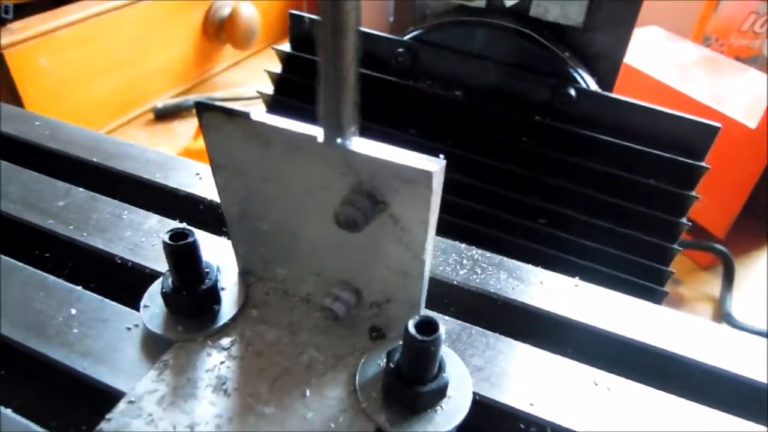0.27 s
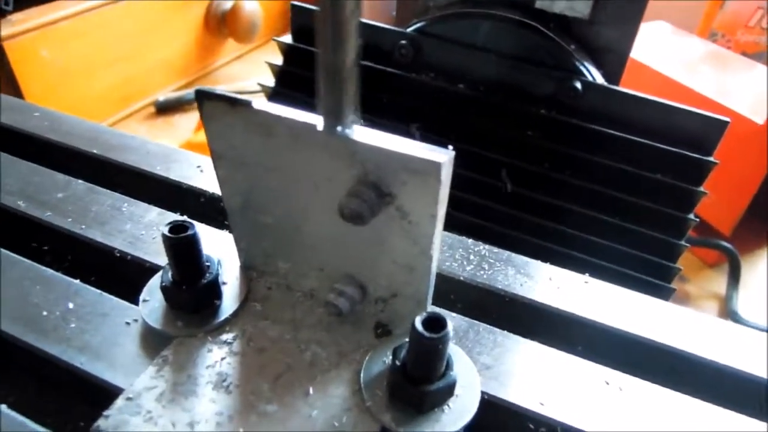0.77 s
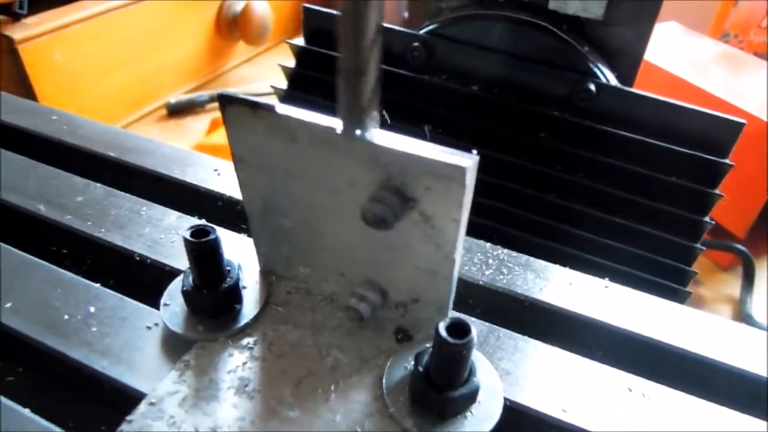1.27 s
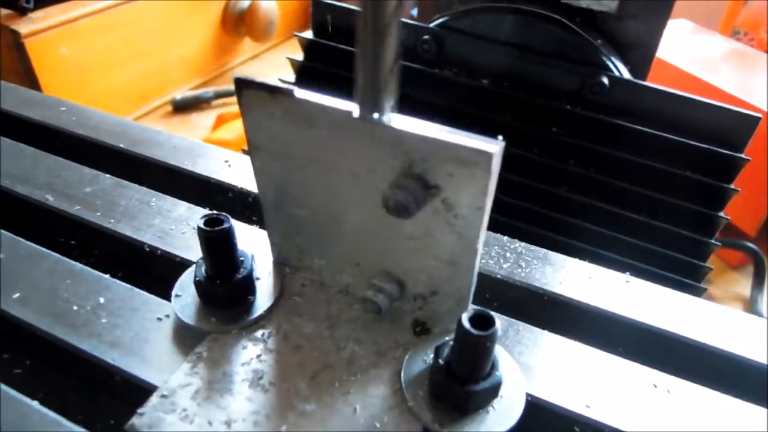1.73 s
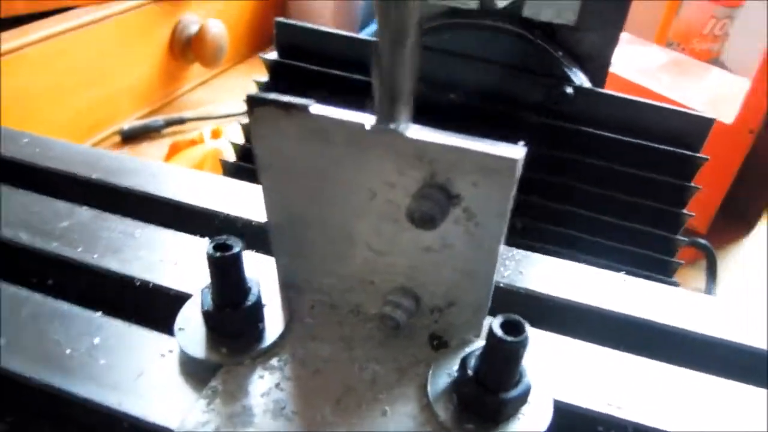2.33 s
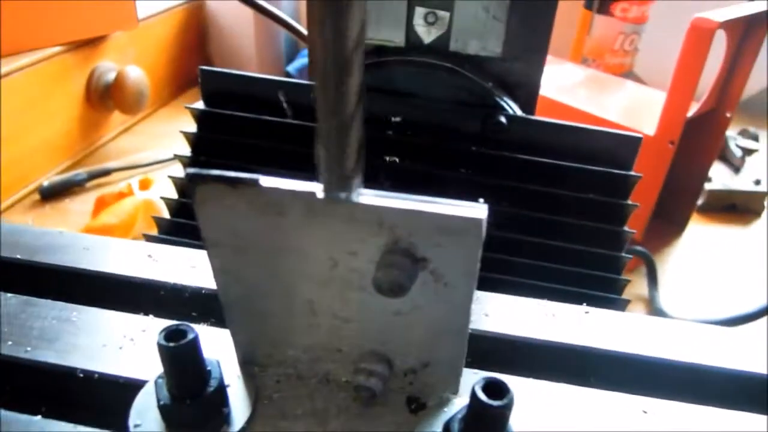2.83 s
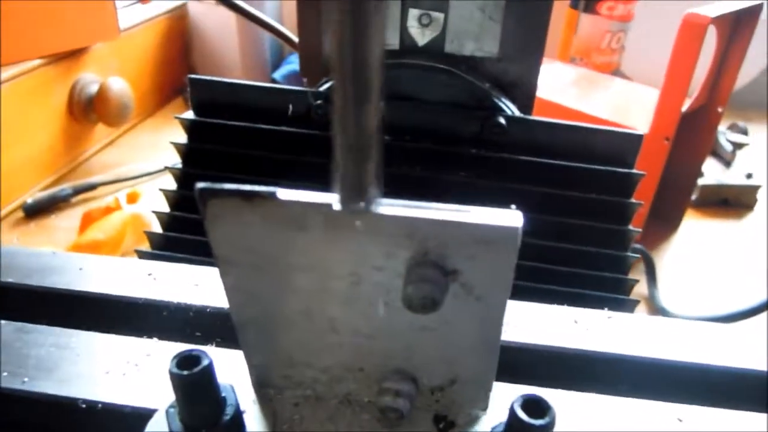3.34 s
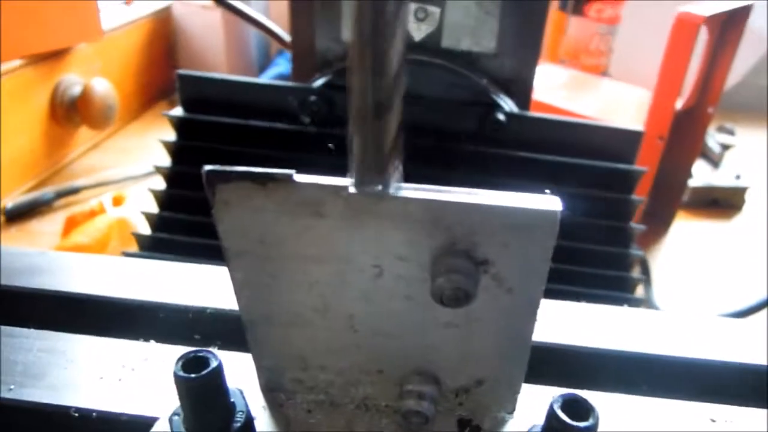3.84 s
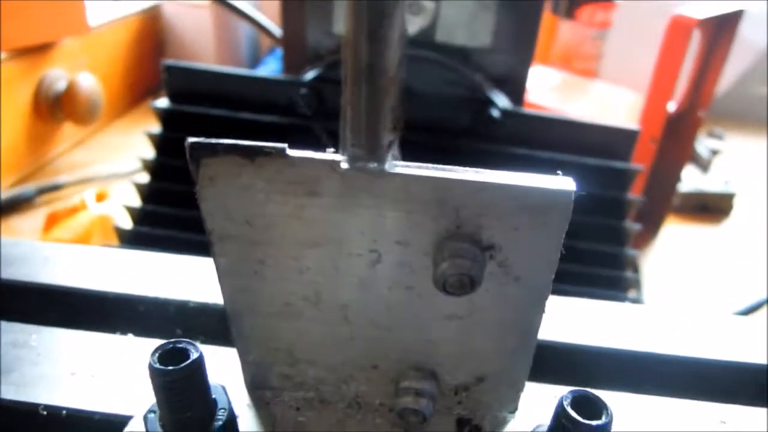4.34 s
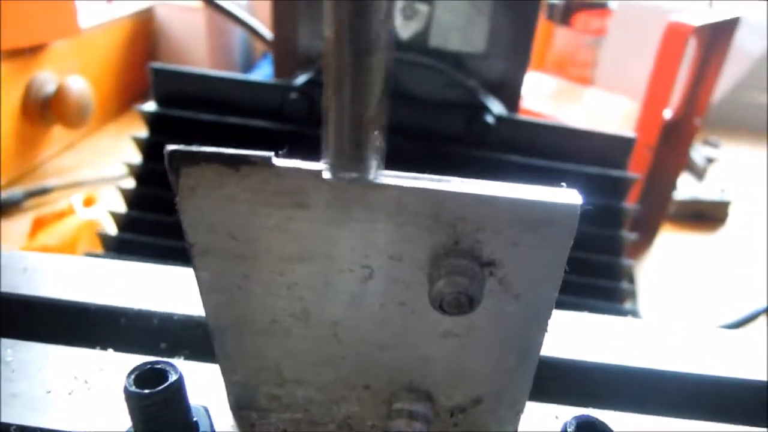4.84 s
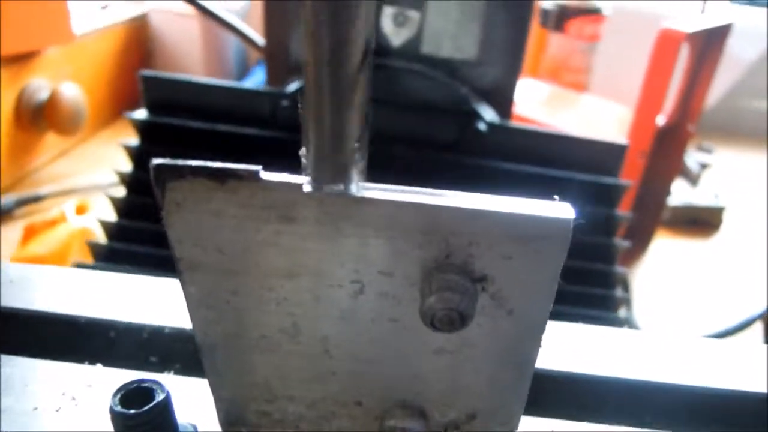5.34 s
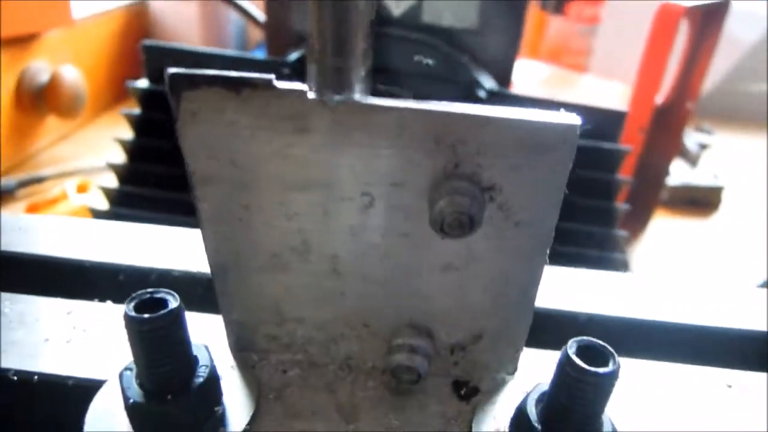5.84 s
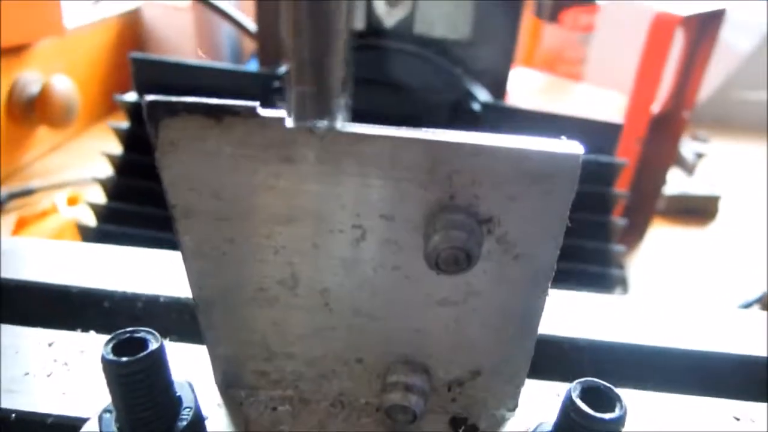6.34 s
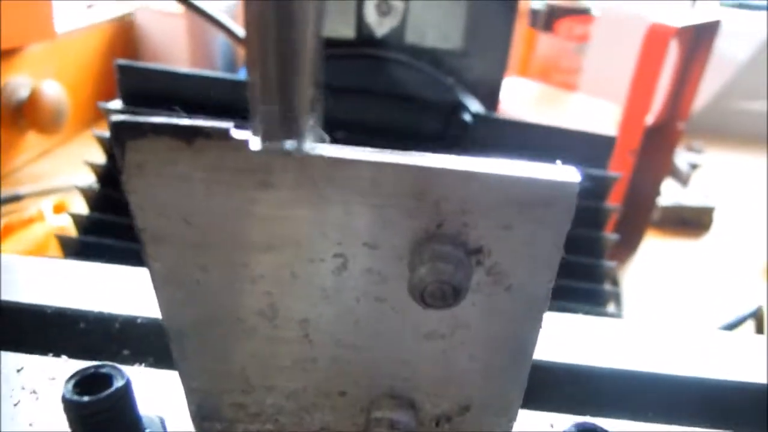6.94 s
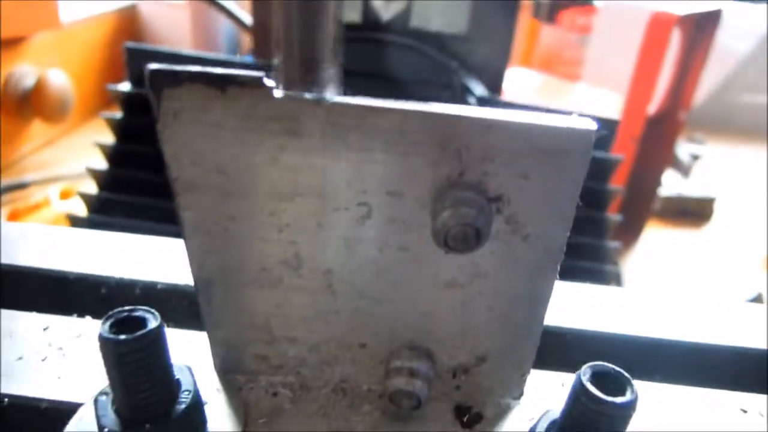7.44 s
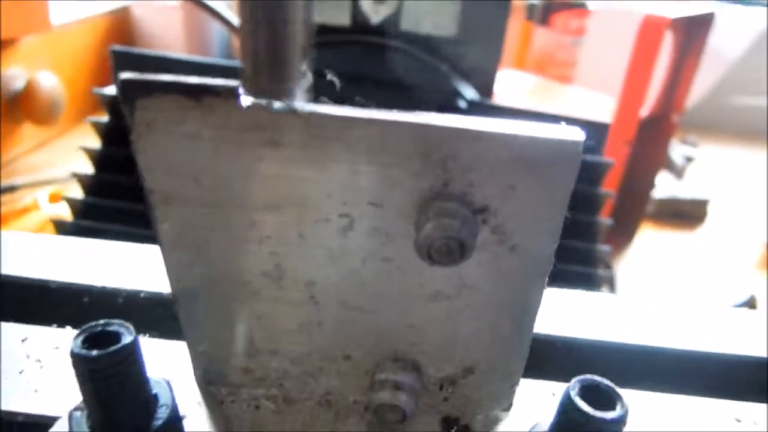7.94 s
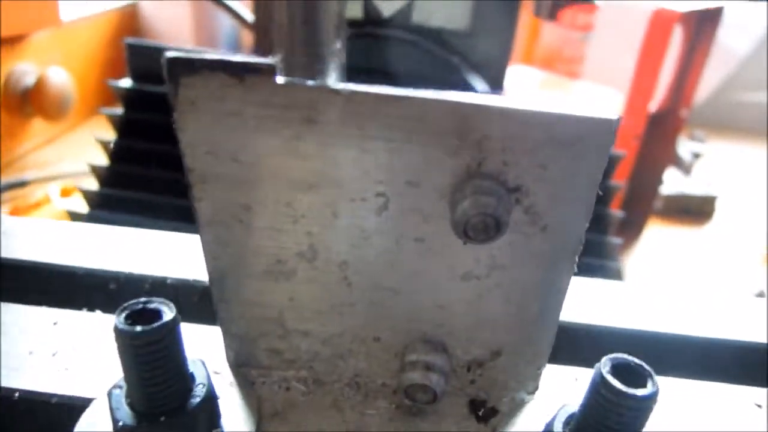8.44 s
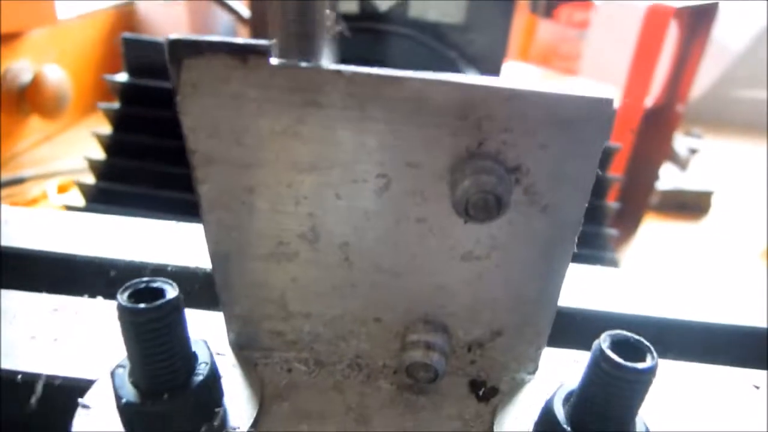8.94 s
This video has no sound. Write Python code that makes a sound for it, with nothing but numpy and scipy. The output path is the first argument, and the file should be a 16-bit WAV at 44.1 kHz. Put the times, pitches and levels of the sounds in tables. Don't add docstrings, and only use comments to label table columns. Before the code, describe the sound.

Continuous loud metallic gear rattle and buzzing whine of a small mill, with rapid cutter knocks ringing a steel plate, roughening near its free end.

```python
import sys
import numpy as np
from scipy import signal
from scipy.fft import rfft, irfft, next_fast_len
from scipy.io import wavfile

SR = 44100
rng = np.random.default_rng(int(sys.argv[2]) if len(sys.argv) > 2 else 0)


def ratio(d):
    e = np.asarray(d, float) / 20
    return 10 ** e


def transcribe(signal):
    frames = np.atleast_2d(signal).T
    limited = np.clip(frames, -1, 1)
    pcm = np.round(limited * 32767).astype(np.int16)
    wavfile.write(sys.argv[1], SR, pcm)


N = 405719

SPINDLE_HZ, MAINS_HZ, MESH_HZ = 18.29, 99.79, 567.755
BITE_LAG_S = 0.0024
CHATTER_ORDER = 46
CHATTER_S, CHATTER_SPREAD_S, CHATTER_GAIN = 7.62, 0.33, 0.9

# (time [s], lead [turns])
SPINDLE_LEAD = [(0, .008), (2, -.004), (7, .03), (9.2, .03)]
# (time [s], camera round to the front [0-1], cutter near the free end [0-1])
DRIFT = [
    (0, 0.07, 0.15),
    (1.8, 0.12, 0.12),
    (3.2, 0.36, 0.06),
    (5, 0.82, 0),
    (6.4, 0.77, 0.03),
    (7, 0.95, 0.9),
    (8.2, 0.94, 0.77),
    (9.2, 1, 0.85),
]
CONTACT_TURNS = np.array([.022, .104, .285, .356, .543, .596, .779, .854])
# (knock [dB], ring [dB], bite [dB])
MID_FLUTES = [(-10.6, -3.6, -5), (-.3, 2.8, 0), (-8.9, -6.4, -14), (-7, -18.9, -7), (-4, -7.3, -9),
              (-.9, 3, -2), (-8.9, -5.9, -14), (.5, -23.6, -1)]
# (knock [dB], ring [dB], bite [dB])
END_FLUTES = [(-5.5, -28.7, -8), (-2.9, -10, -4), (-13.2, -18, -16), (-14.6, -18, -13), (-3.9, -14, -10),
              (.1, -12, -7), (-9.2, -15.5, -14), (-5.9, 0, 4)]
# (time [s], spread [s], load [dB], extra plate ring [dB])
FEED_PUSHES = [(.66, 0.11, 0.6, 1), (1.11, 0.058, 0, -5), (1.69, 0.076, 4, -0.5), (2.25, 0.31, -1, 3.5),
               (2.56, 0.069, 1.8, 2), (2.89, 0.27, -0.8, -3), (3.28, 0.098, 1, 3), (3.51, 0.04, 0, -5),
               (3.86, 0.11, 2, -0.5), (4.2, 0.061, 0, 0.5), (4.4, 0.13, -0.6, -2.5), (4.9, 0.16, 1.5, 2.5),
               (5.35, 0.18, 0.85, -1), (5.85, 0.41, 0.27, 1), (6.55, .12, 1.7, 1), (7.311, .16, -2.5, -0.5),
               (7.72, .12, 3, -2), (7.945, 0.012, -3, -5), (8.15, 0.16, 1, -1), (8.5, .12, 1.3, 4),
               (8.95, 0.25, -0.2, 2)]
# (time [s], peak [dB])
TOOTH_SNAPS = [(0.224, -2), (0.3855, -6), (0.4928, 1), (0.6873, -3), (1.1266, 0), (1.726, -10), (1.853, 0),
               (1.9455, -9), (2.0777, -4), (2.6594, -1), (2.6873, 1.5), (3.1505, -3), (3.7105, -2),
               (3.806, -3), (3.9164, -3), (3.9419, -5), (5.063, 0.5), (5.1963, 1), (5.575, 3), (5.883, 0),
               (6.697, 1), (6.978, 5), (7.0457, 2), (7.0975, 2.5), (7.9189, 7), (8.248, -5), (8.5205, -3),
               (8.6303, 3), (9.001, 0), (9.123, -8)]
# (order [per turn], level at mid-plate [dB], level near the free end [dB])
ORDER_HUM = [(3, -42, -34), (4, -14.5, -10), (5, -35, -12), (6, -20, -16), (7, -15.5, -8.5),
             (8, -13.5, -12), (10, -48, -17), (11, -20, -21), (12, -12.5, -9), (13, -18.5, -13),
             (14, -20.5, -10), (16, -23, -25), (17, -15, -9), (18, -12, -9), (20, -6.5, -14)]
# (frequency [Hz], width [Hz], level [dB])
PLATE_MODES = [(822.7, 44.5, 8.5), (875, 59, -12)]
# (frequency [Hz], width [Hz], level [dB])
CLAMP_MODES = [(430, 61, 5), (690, 290, 4.5)]
# (frequency [Hz], width [Hz], level [dB])
HEAD_MODES = [(3070, 220, 0.5), (3235, 300, -0.5)]
# (frequency [Hz], width [Hz], level [dB])
TABLE_MODES = [(1185, 130, -1), (1447, 80, -1), (1810, 157, 1), (2653, 125, 4)]
# (frequency [Hz], width [Hz], level [dB])
SIDE_MODES = [(3690, 120, -4), (4190, 78, -3), (4520, 96, -1), (4880, 94, -1), (5850, 350, -4),
              (6430, 350, 0), (7120, 300, -5), (8340, 100, -5), (8700, 200, -3), (9950, 270, -8),
              (11900, 200, -12), (12400, 100, -10)]
FRONT_MODES = [(4530, 130, -2), (4920, 140, 1), (6060, 610, -5), (8040, 260, -5), (8650, 150, -5),
               (10300, 270, -7), (11400, 460, -10), (12450, 260, -9)]
# (frequency [Hz], level per Hz [dB])
SIDE_AIR = [(2060, -26), (3500, -2.5), (5110, -1), (6490, 2), (7960, -7.5), (8640, -4.5), (10500, -14),
            (12200, -15.5), (14100, -26)]
FRONT_AIR = [(2060, -27), (3500, -9.5), (3930, -11.5), (4970, 0), (5480, -6.5), (8150, -4), (9270, -8.5),
             (10500, -4), (14100, -17.5)]
TABLE_AIR = [(700, -26), (950, -11), (1100, -5.5), (2400, -1), (2900, -4.5), (3700, -18), (4500, -14.5)]
FRAME_RUMBLE = [(13, -59), (22, -34), (69, -15.5), (136, -13), (174, -21), (223, -7.5), (285, -13),
                (443, -10), (538, -6), (727, 0.5), (808, -12), (1020, -27), (1170, -8.5), (1500, -18.5),
                (1950, -46), (3300, -120)]
# (frequency [Hz], level per Hz [dB])
FREE_END_AIR = [(3000, -23), (3700, -6), (4300, -3), (5000, -25)]
# (frequency [Hz], difference under sum [dB])
PORT_DIFFERENCE = [(60, -5), (110, -9), (200, -25), (380, -14.5), (690, -36), (1280, -27), (2360, -29),
                   (4350, -12), (8030, -10.5), (14800, 1)]
# (frequency [Hz], left over right [dB])
PORT_TILT = [(60, -0.5), (99, -3), (160, 0.5), (270, -0.5), (440, 0.5), (730, 0.5), (1210, -1), (2000, 2),
             (3300, -1), (5440, 1), (8970, 2.5), (14800, 0.5)]
# (frequency [Hz], level [dB])
BAND_EDGE = [(14170, 0), (14200, -30), (15000, -70)]
# (at rest [dB], per load [dB/dB], gain from front [dB], gain at free end [dB])
RING_LAW = (-32, 1, 3, -3)
KNOCK_LAW = (-34.5, 1.05, 3, -2)
RATTLE_LAW = (-22.5, 1, 0.65, -1.23)
HEAD_LAW = (-27, 0.6, -2, -2.5)
HUM_LAW = (-40.5, 0.96, 2.5, -2.5)


def unit(x):
    return x / np.sqrt(np.mean(x ** 2) + 1e-20)


def along(points, hz):
    f, value = np.transpose(points)
    return np.interp(np.log(hz + 1), np.log(f + 1), value)


def curves(rows):
    s, *columns = np.transpose(rows)
    return [np.interp(np.arange(N) / SR, s, c) for c in columns]


def drift():
    return [np.clip(c, 0, 1) for c in curves(DRIFT)]


def wobble(rate):
    knots = int(N * rate / SR) + 2
    return 1.15 * np.interp(np.arange(N) * rate / SR, np.arange(knots), rng.standard_normal(knots))


def filtered(x, response):
    m = next_fast_len(N + SR // 8)
    grid = np.arange(0, SR / 2 + 4, 4.)
    hz = np.fft.rfftfreq(m, 1 / SR)
    gain = np.array([np.interp(hz, grid, row) for row in np.atleast_2d(response(grid))])
    return irfft(rfft(x, m) * gain, m)[..., :N].reshape(np.shape(x))


def modes(rows):
    def response(f):
        total = 0
        for k, (centre, width, db) in enumerate(rows):
            damping = 1j * f * width
            total = total + (-1) ** k * ratio(db) * damping / (centre * centre - f * f + damping)
        return total
    return response


def colour(air, rows, air_db):
    def gain(f):
        power = ratio(along(air, f) + air_db) ** 2
        for centre, width, db in rows:
            damping = (f * width) ** 2
            peak = damping / ((centre * centre - f * f) ** 2 + damping)
            power = power + ratio(db) ** 2 * peak ** 2
        return np.sqrt(power)
    return gain


def rush(envelope, gain, wide_db):
    def both(hz):
        return gain(hz) * np.array([np.ones_like(hz), ratio(along(PORT_DIFFERENCE, hz) + wide_db)])
    mid, side = filtered(envelope * rng.standard_normal((2, N)), both)
    return np.array([mid + side, mid - side]) / np.std(mid)


def loudness(law, extra=0):
    t = np.arange(0, N, 64) / SR
    s, *columns = np.transpose(DRIFT)
    front, end = (np.clip(np.interp(t, s, c), 0, 1) for c in columns)
    pushes = np.array(FEED_PUSHES)
    bells = np.exp(-0.5 * ((t[:, None] - pushes[:, 0]) / pushes[:, 1]) ** 2)
    load_db, ring_db = (bells @ pushes[:, 2:]).T
    rest_db, per_load, front_db, end_db = law
    level_db = rest_db + per_load * load_db + extra * ring_db + front_db * front + end_db * end
    return np.interp(np.arange(N) / SR, t, level_db)


def turns():
    return SPINDLE_HZ * np.arange(N) / SR + curves(SPINDLE_LEAD)[0]


def contacts(column, steady, scatter, jitter_s):
    angle = np.arange(int(SPINDLE_HZ * N / SR) + 1)[:, None] + np.array(CONTACT_TURNS)
    at = np.interp(angle, turns(), np.arange(N))
    end = drift()[1][at.astype(int)]
    mid_db, end_db = np.array(MID_FLUTES)[:, column], np.array(END_FLUTES)[:, column]
    chance = rng.standard_normal((2, *at.shape))
    size = ratio(0.5 * (1 - end) * mid_db + end * end_db) * (steady + scatter * chance[1])
    size = size * (at < N - 1)
    moved = np.clip(at + SR * jitter_s * chance[0], 0, N - 1).astype(int)
    return np.bincount(moved.ravel(), size.ravel(), N)


def repeating(orders, response, column, levels_db=None):
    end = drift()[1]
    k = np.round(orders)
    phase = np.exp(-2j * np.pi * np.outer(k, CONTACT_TURNS))
    both = []
    for late, flutes in enumerate((MID_FLUTES, END_FLUTES)):
        blows = phase @ ratio(np.array(flutes)[:, column]) * response(k * SPINDLE_HZ)
        if levels_db is not None:
            blows = ratio(levels_db[late]) * blows / abs(blows)
        lines = np.zeros(2 ** 10 + 1, complex)
        lines[k.astype(int)] = blows
        one_turn = unit(irfft(lines))
        both.append(np.interp(turns() % 1, np.arange(2 ** 11) / 2 ** 11, one_turn, period=1))
    return (1 - end) * both[0] + end * both[1]


def spindle():
    orders, *levels_db = np.transpose(ORDER_HUM)
    hum = repeating(orders, modes([(110, 82, 0)]), column=1, levels_db=levels_db)
    hum = hum * ratio(0.53 * wobble(12))
    rumble = rush(ratio(0.55 * wobble(30)), lambda hz: ratio(along(FRAME_RUMBLE, hz)), wide_db=3.5)
    return ratio(loudness(HUM_LAW) - 0.6) * hum + ratio(loudness(KNOCK_LAW) - 5.0) * rumble


def chatter():
    swell = np.exp(-0.5 * ((np.arange(N) / SR - CHATTER_S) / CHATTER_SPREAD_S) ** 2)
    return CHATTER_GAIN * swell * np.sin(2 * np.pi * CHATTER_ORDER * turns())


def struck(column, response, jitter_s):
    return unit(filtered(contacts(column, steady=1, scatter=0.16, jitter_s=jitter_s), response))


def bending(f):
    return modes(PLATE_MODES)(f) * modes([(800, 330, 0)])(f)


def clamping(f):
    return modes(CLAMP_MODES)(f) * modes([(520, 380, 0)])(f)


def plate():
    end = drift()[1]
    ring_db, knock_db = loudness(RING_LAW, extra=0.62), loudness(KNOCK_LAW)
    friction = unit(filtered(rng.standard_normal(N), bending))
    held = 0.8 * repeating(np.arange(40, 55), bending, column=1)
    held = held + 0.22 * (1 - end) * struck(column=1, response=bending, jitter_s=0.00094)
    freed = end * struck(column=1, response=bending, jitter_s=0.00016)
    ring = held + chatter() + freed + 0.45 * (1 - 0.31 * end) * friction
    loose = 0.27 + 0.15 * end
    knock = (1 - loose) * repeating(np.arange(21, 40), clamping, column=0)
    knock = knock + 0.57 * loose * struck(column=0, response=clamping, jitter_s=0.00098)
    return ratio(ring_db + 0.5) * ring + ratio(knock_db + 2.0) * knock


def mains(depth_db):
    return ratio(depth_db * np.cos(2 * np.pi * (MAINS_HZ * np.arange(N) / SR + 0.41)))


def tooth_snaps():
    blows = np.zeros(N)
    for s, db in TOOTH_SNAPS:
        blows[round(s * SR)] = ratio(db + 15.5)
    tail = np.arange(SR // 50) / SR
    decay = ratio(-60 * tail / 0.0072) * (1 - np.exp(-tail / 0.00081))
    return signal.fftconvolve(blows, decay)[:N]


def tooth_force():
    hits = abs(contacts(column=2, steady=0.87, scatter=0.17, jitter_s=0.0022))
    bite = signal.fftconvolve(hits, np.hanning(int(0.0096 * SR)), "same")
    bite = np.roll(bite, round(BITE_LAG_S * SR))
    chance = ratio(1.74 * wobble(200) + 0.22 * wobble(36))
    force = (0.33 + 0.85 * bite) * mains(depth_db=3.5) * chance
    force = np.tanh(0.63 * unit(force))
    since_tooth = (MESH_HZ * np.arange(N) / SR - 0.35) % 1
    teeth = unit(force * (0.74 + np.exp(-since_tooth / 0.54)))
    return teeth + tooth_snaps()


def gearbox():
    rattle_db, head_db = loudness(RATTLE_LAW), loudness(HEAD_LAW)
    front, end = drift()
    force = tooth_force()

    def loose(rough_db):
        return force * ratio(rough_db * wobble(330))

    case = 0
    for share, air, rows in ((1 - front, SIDE_AIR, SIDE_MODES), (front, FRONT_AIR, FRONT_MODES)):
        gain = colour(air, rows, air_db=-2.0)
        panels = rush(loose(2.36), lambda f: gain(f) / np.sqrt(1 + (f / 7400) ** 8), wide_db=-3.5)
        teeth = rush(loose(2.95), lambda f: gain(f) / np.sqrt(1 + (7400 / (f + 1)) ** 8), wide_db=0.3)
        case = case + np.sqrt(share) * (panels + ratio(-3.0 + 1.74 * front) * teeth)
    squeal = rush(force, lambda f: ratio(along(FREE_END_AIR, f)), wide_db=-13.0)
    case = case + ratio(-8.5) * end * squeal

    head_air = [(20, -80), (2400, -29), (3100, -45), (4000, -32.5)]  # (frequency [Hz], level per Hz [dB])
    head_force = loose(0.68) ** 0.8 * mains(depth_db=3.0)
    head = rush(head_force, colour(head_air, HEAD_MODES, air_db=3.5), wide_db=5.0)
    table = rush(force ** 0.38, colour(TABLE_AIR, TABLE_MODES, air_db=0.5), wide_db=-12)
    mix = ratio(rattle_db - 1.62) * case + ratio(head_db + 0.44) * head
    return mix + ratio(rattle_db - 9.0 + 2.0 * front) * table


def scene():
    return spindle() + plate() + gearbox()


def roll_off(x):
    return signal.sosfilt(signal.butter(12, 15400, fs=SR, output="sos"), x)


def record(dry):
    dry = dry / (1 + abs(dry / 0.93) ** 6) ** (1 / 6)
    halves = np.array([[0.5], [-0.5]])
    mix = filtered(dry, lambda hz: ratio(along(PORT_TILT, hz) * halves + along(BAND_EDGE, hz)))
    return roll_off(mix)


dry = scene()
out = record(dry)
transcribe(out)
```